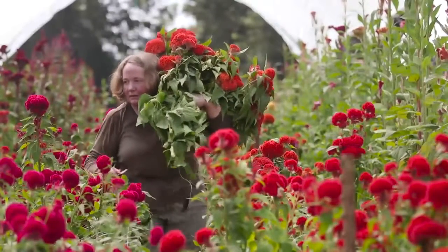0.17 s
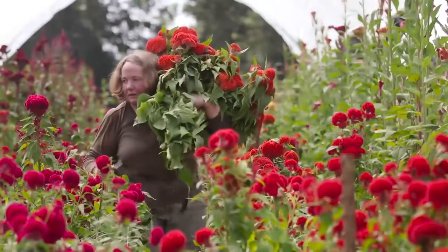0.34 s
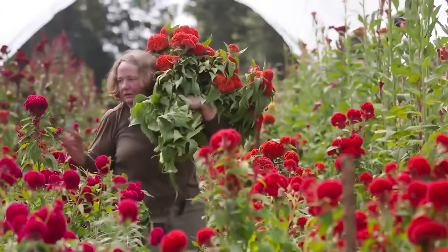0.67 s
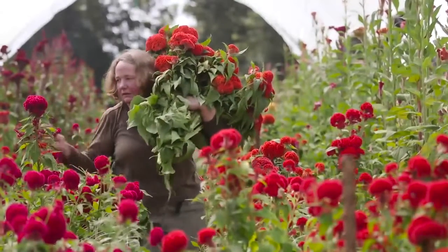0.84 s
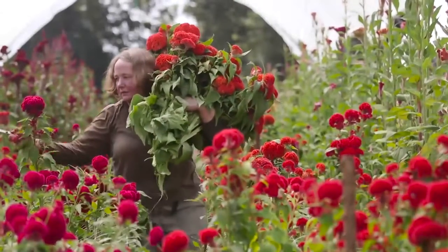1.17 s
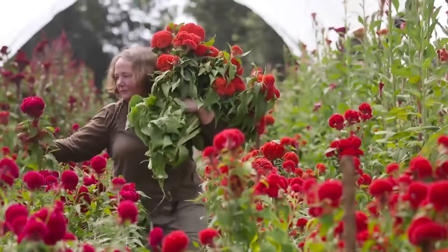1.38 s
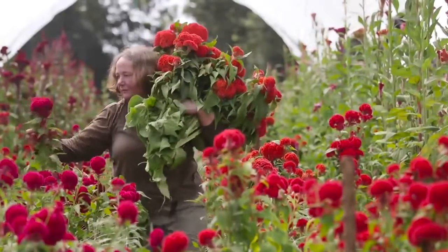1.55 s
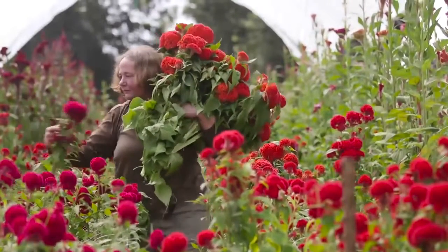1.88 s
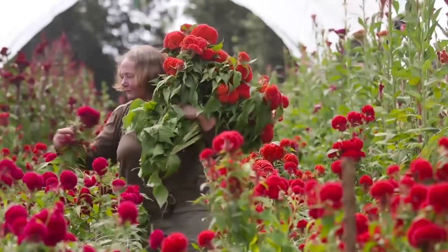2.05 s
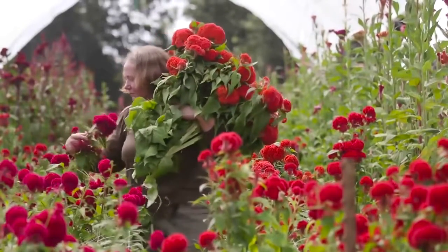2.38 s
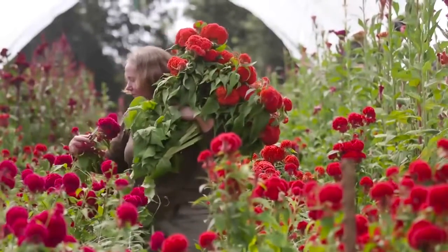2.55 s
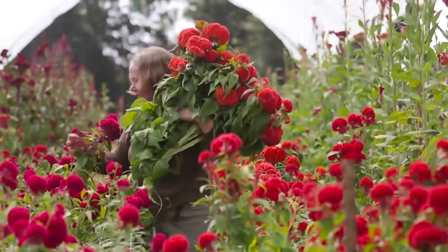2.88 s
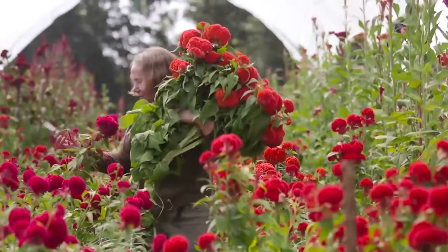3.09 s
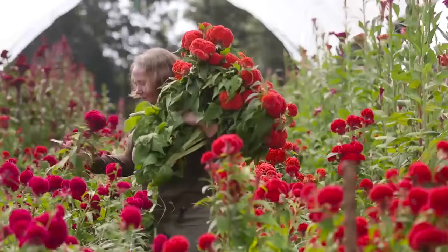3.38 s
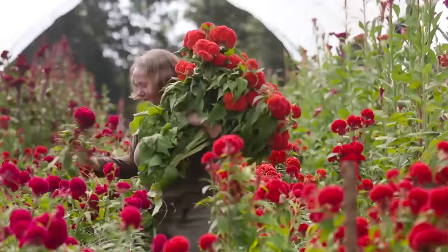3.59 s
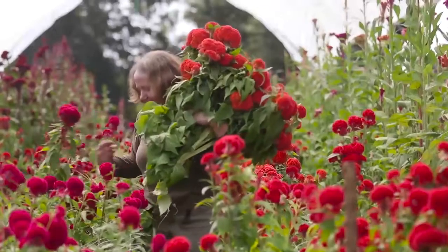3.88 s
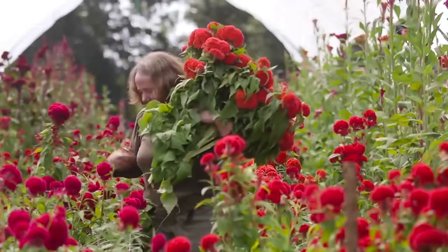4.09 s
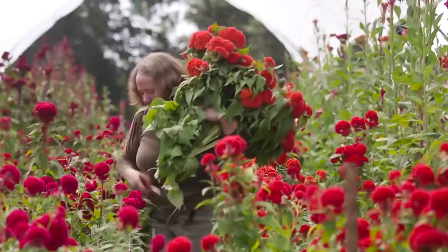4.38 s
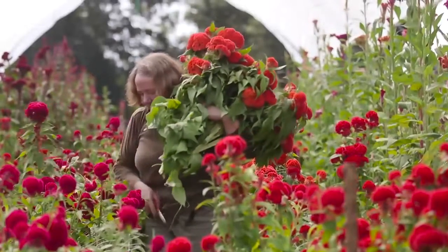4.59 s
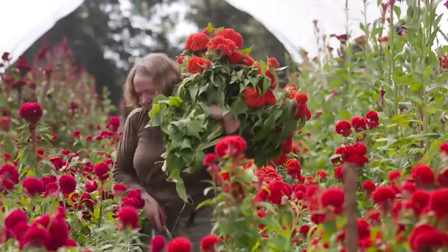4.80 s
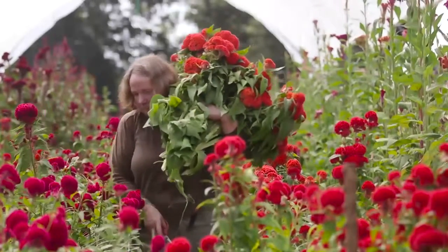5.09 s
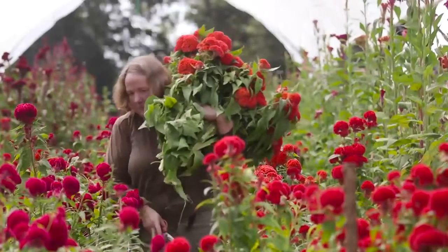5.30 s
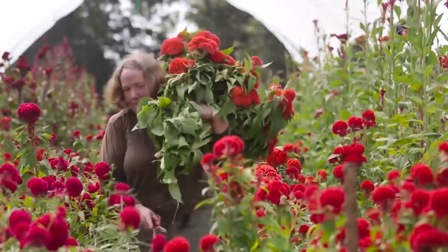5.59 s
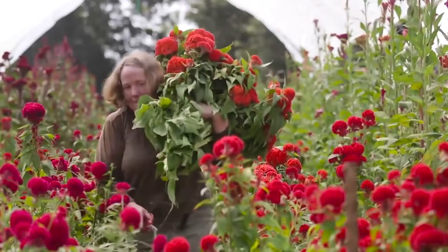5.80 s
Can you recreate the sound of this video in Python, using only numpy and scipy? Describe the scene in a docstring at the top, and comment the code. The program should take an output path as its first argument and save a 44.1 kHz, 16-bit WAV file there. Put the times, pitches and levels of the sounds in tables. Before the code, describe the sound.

A high, fast-pulsing trill of crickets runs throughout in a summer flower field, with a few nearby singers over a blurred distant chorus and the fine hiss and rhythmic rasps of katydids. In the first 0.3 seconds the microphone pops a few times, mostly on the left. A distant bird sings a short gliding phrase twice between 0.2 and 0.9 seconds. Other birds give a quick chirp run at 1.5 seconds and scattered chirps from 2.5 to 4. One close cricket swells until it stops near 3.8 seconds; another joins from about 2.6 to 5.6. Leaves rustle faintly in short brushes between 2.5 and 5.5 seconds. The first bird returns at 4.5 seconds, repeating its phrase four times until the end, near 6 seconds. Underneath lie soft countryside air, a slight early breeze on the left and a very faint, far engine hum.

```python
"""Three ground crickets trill in a summer flower field by stridulation: each wing stroke draws a scraper
over a file and gives a short falling whistle, which the plants scatter. Many more sing further off,
with the fine hiss of meadow katydids. A far bird repeats a gliding phrase, others chirp, and leaves
rustle. At the start the microphone pops a few times, mostly on the left. Behind it all a far engine
hums in the soft noise of the countryside."""
import sys
import numpy as np
from scipy import signal
from scipy.fft import rfft, irfft
from scipy.io import wavfile
from scipy.ndimage import uniform_filter1d

SR = 44100
rng = np.random.default_rng(int(sys.argv[2]) if len(sys.argv) > 2 else 0)


def store_wav(level_fs):
    """Save 16-bit WAV to argv[1]."""
    pcm = np.round(np.clip(np.atleast_2d(level_fs), -1, 1) * 32767)
    wavfile.write(sys.argv[1], SR, pcm.T.astype(np.int16))


N = 261890
T = np.arange(N) / SR
FREQ = np.maximum(np.fft.rfftfreq(N, 1 / SR), 1)
EAR_SIGN = np.array([[1], [-1]])  # left, right


def near_crickets():
    """Superposition: three crickets sing independently, each with its own pitch and spell of song."""
    # drift of each singer: t/s, lead over the even beat/strokes, tooth rate f/Hz before the sag
    high_drift = [(0, -.38, 8196), (.75, -.55, 8197), (3.3, -.45, 8200), (5.94, -.41, 8200)]
    low_drift = [(0, -.05, 7795), (1.6, -.04, 7790), (2.6, -.14, 7790), (3, -.28, 7800), (3.8, -.3, 7790)]
    late_drift = [(2.7, -.08, 7900), (3.65, -.21, 7890), (3.95, -.54, 7770), (4.6, -.43, 7785),
                  (5, -.23, 7880), (5.5, -.17, 7890)]
    # song lists the first four arguments of bout(); shape is unpacked in trill()
    high = cricket(high_drift, stroke_hz=32.3, song=(-2, 8, -42.6, 1),
                   shape=(-.34, .38, .22, .32, 70, 210),
                   bounce_db=-20, lead_rad=-.74, pan_db=1.5, echo_db=-3, t60=.07)
    low = cricket(low_drift, stroke_hz=29.8, song=(-4, 3.82, -38.2, 5.4),
                  shape=(-.37, .39, .32, .15, 170, 250),
                  bounce_db=-11, lead_rad=1.67, pan_db=-2.5, echo_db=-9, t60=.03)
    late = cricket(late_drift, stroke_hz=29.8, song=(2.6, 5.57, -43.3, 1.4),
                   shape=(-.38, .39, .3, .2, 240, 260),
                   bounce_db=-18, lead_rad=2.1, pan_db=-.5, echo_db=-3.5, t60=.064)
    return high + low + late


def cricket(drift, stroke_hz, song, shape, bounce_db, lead_rad, pan_db, echo_db, t60):
    """Two-path interference: a delayed ground reflection beats against the falling direct tone."""
    ground_lag_s = .0054
    gain = bout(*song, stop_s=.02) * undb(-.4 * walk(3.2))
    wings = trill(stroke_hz * T + curve(drift), curve(drift, axis=2), shape)
    plant_sway = np.exp(.3j * walk(1.96))
    bounce = np.roll(wings, int(ground_lag_s * SR)) * plant_sway
    wings = unit(wings + undb(bounce_db) * bounce) * np.sqrt(2) * gain
    echoes = scatter(wings.real, t60)
    # the part of the echoes in step with the wings is removed, so only the diffuse field is added
    coherent = 2 * np.outer(echoes @ wings.conj() / np.vdot(wings, wings), wings).real
    diffuse = undb(echo_db) * (echoes - coherent)
    return (at_ears(wings, lead_rad) + diffuse) * undb(EAR_SIGN * pan_db / 2)


def trill(strokes, hz, shape, spread_hz=9):
    """Stridulation: a scraper runs down a file once a stroke, and the wing rings at the tooth rate."""
    start, end, attack, release, fall_hz, sag_hz = shape  # the first four in strokes
    sag_at, sag_bend = .25, .1  # in strokes
    nearest = np.round(strokes).astype(int)
    pitch, uneven_db, timing = rng.standard_normal((400, 3))[nearest % 400].T
    u = strokes - nearest + .025 * timing  # position within the stroke
    # the pitch eases down through most of the stroke, then drops ever faster
    sag = fall_hz * u + sag_hz * np.exp((np.minimum(u, end) - sag_at) / sag_bend)
    tooth_hz = hz + spread_hz * pitch - sag + 14 * walk(500)
    ramp = np.clip(np.minimum((u - start) / attack, (end - u) / release), 0, 1)
    envelope = unit(np.sin(np.pi / 2 * ramp) ** 2 * undb(uneven_db))
    return np.sqrt(2) * envelope * np.exp(2j * np.pi * np.cumsum(tooth_hz) / SR)


def far_crickets(count=22):
    """Incoherent addition: many trills of unrelated pitch and beat blur into a chorus."""
    # chorus spectrum: f/Hz, gain/dB
    spectrum = [(5800, -57), (6400, -30), (6900, -11.5), (7200, -2.5), (7450, 1.5), (7700, 6), (8000, 6),
                (8250, -18), (8400, -24)]
    # chorus strength: t/s, relative level/dB
    levels = [(0, -46.8), (2, -45.4), (3.9, -47.6), (5.45, -46.4), (5.65, -50.8)]
    shape = (-.37, .37, .37, .37, 150, 150)
    chorus = 0
    for hz in np.linspace(6000, 8200, count):
        strokes = rng.uniform(24, 36) * T + rng.random() + .2 * walk(2)
        chorus = chorus + scatter(trill(strokes, hz, shape, spread_hz=64.97).real, t60=.034)
    return unit(colour(chorus, spectrum)) * undb(curve(levels) + 4.5)


def katydids():
    """Broadband stridulation: far hiss, high buzzes and one singer's lisps and rasps add in power."""
    # hiss spectrum: f/Hz, gain/dB
    spectrum = [(4500, -11), (6300, -12.5), (7600, 0), (8600, 3.5), (8950, -2.5), (9300, 1.4), (9900, 0.8),
                (11500, -3.5), (13000, -5.5), (14500, -3.5), (15800, -5)]
    # long, very high buzzes: start t/s, end t/s, level/dB, swell time/s
    buzzes = [(-1, 1.61, -44.4, .8), (-1, 4.38, -50, .5), (-1, 5.19, -50, .5), (2.1, 4.06, -45.2, 1.8),
              (5.25, 7, -46.6, .17)]
    # runs of a short lisp followed by a longer rasp: first lisp t/s, repeats
    lisp_runs = [(-.235, 2), (.738, 12)]
    period_s, lisp_s, lisp_db = .445, .051, -44.5
    rasp_after_s, rasp_s, rasp_db = .25, .48, -47
    split_hz, far_lower_db, far_upper_db, buzz_spill_db = 11800, -48, -55, -5
    through_stems = scatter(rng.standard_normal(N), t60=.095)
    hiss = colour(through_stems + undb(-7) * wide_noise(1.15), spectrum)
    top = irfft(rfft(hiss) / (1 + (split_hz / FREQ) ** 16), N)
    beats = [first + k * period_s for first, count in lisp_runs for k in range(count)]
    lisps = sum(undb(lisp_db + rng.standard_normal()) * arch((T - s) / lisp_s) for s in beats)
    rasp_power = undb(rasp_db) ** 2 * sum(arch((T - s - rasp_after_s) / rasp_s) for s in beats)
    buzz_power = sum(bout(*row, stop_s=.078) ** 2 for row in buzzes)
    lower_power = undb(far_lower_db) ** 2 + rasp_power + undb(buzz_spill_db) ** 2 * buzz_power
    upper_power = undb(far_upper_db) ** 2 + buzz_power
    lower = unit(hiss - top) * np.sqrt(lower_power) * undb(1.3 * walk(16))
    upper = unit(top) * np.sqrt(upper_power) * undb(.24 * walk(12))
    lisp_spectrum = [(7500, -19), (9000, 6), (11000, 6), (12000, 0), (14000, -14)]  # f/Hz, gain/dB
    lisp_noise = unit(colour(wide_noise(-4.5), lisp_spectrum))
    pulsed = lower * pulsing(stroke_hz=89) + upper * pulsing(stroke_hz=69)
    return pulsed * undb(.5 * walk(120)) + lisps * lisp_noise


def pulsing(stroke_hz, depth_db=.65):
    """Amplitude modulation by a katydid's slightly uneven wing strokes."""
    return undb(depth_db * np.sin(2 * np.pi * (stroke_hz * T + .26 * walk(9))))


def bird():
    """Reverberation: trees smear the repeated phrase of a far bird straight ahead and add a tail."""
    # one phrase: offset t/s, length/s, start f/Hz, end f/Hz, upward bow/Hz, level/dB, roughness/Hz
    notes = [(-.135, .06, 3700, 3520, 40, -5.5, 100), (-.112, .05, 3250, 2920, -40, -5.5, 90),
             (-.018, .044, 2720, 2220, 0, -.5, 80), (.002, .056, 2240, 2210, -55, 0, 35),
             (.05, .04, 3000, 2920, 0, -4, 25), (.09, .066, 2540, 2610, 100, 0, 36),
             (.13, .05, 2300, 1750, -60, -4.5, 120)]
    # phrases of two songs: t/s, relative level/dB, tilt towards high notes/(dB per octave)
    phrases = [(.283, -45.8, -2), (.692, -46.2, -2), (4.535, -48.8, 0), (4.955, -49.2, 1),
               (5.378, -48.8, 2), (5.822, -51.5, 3)]
    pivot_hz = 2700
    sung = []
    for start, phrase_db, tilt in phrases:
        for offset, length, from_hz, to_hz, bow_hz, db, rough_hz in notes:
            note_db = phrase_db + db + tilt * np.log2(from_hz / pivot_hz)
            sung.append((start + offset, length, from_hz, to_hz, bow_hz, note_db, rough_hz))
    song = whistles(sung)
    return undb(-.5) * song + undb(-9) * scatter(song, t60=.07) + undb(-4) * scatter(song, t60=.5)


def other_birds():
    """Interaural phase: lone chirps from far to one side reach the ears out of step, amid echoes."""
    # chirps: t/s, length/s, start f/Hz, end f/Hz, upward bow/Hz, relative level/dB, roughness/Hz
    chirps = [(1.496, .014, 3480, 3400, 0, -55, 30), (1.515, .016, 3470, 3380, 0, -48.5, 30),
              (1.537, .014, 3440, 3390, 0, -49.5, 30), (1.558, .016, 3430, 3370, 0, -48.5, 30),
              (2.52, .025, 2350, 2520, 0, -55, 40), (2.57, .03, 2950, 3150, 40, -54, 40),
              (2.66, .04, 2750, 2780, 0, -56, 60), (2.765, .025, 2400, 2680, 0, -54.5, 40),
              (2.935, .035, 2200, 2450, 60, -53.5, 40), (2.988, .03, 2720, 3080, 90, -49, 35),
              (3.13, .026, 4050, 4170, 30, -56, 50), (3.175, .05, 2380, 2750, 0, -53.5, 90),
              (3.412, .03, 2780, 3100, 70, -49, 35), (3.51, .03, 2600, 2580, 0, -55, 40),
              (3.53, .16, 3250, 3620, 60, -54, 170), (3.565, .025, 1850, 1900, 0, -55, 30),
              (3.618, .036, 2380, 2680, 60, -50.5, 80), (3.915, .05, 3250, 3600, 70, -51.5, 130)]
    song = whistles(chirps)
    direct = at_ears(signal.hilbert(song), lead_rad=2.1)
    return undb(-2) * direct + undb(-5) * scatter(song, t60=.35)


def whistles(notes):
    """Frequency modulation: bird notes glide and arch, roughened on their way through the trees."""
    song, flutter = np.zeros(N), walk(900)
    for start, length, from_hz, to_hz, bow_hz, db, rough_hz in notes:
        u = (T - start) / length
        on = (u > 0) & (u < 1)
        swell = np.sin(np.pi * u[on])
        glide_hz = from_hz + (to_hz - from_hz) * u[on] + bow_hz * swell
        hz = glide_hz * (1 + .0037 * rng.standard_normal()) + rough_hz * flutter[on]
        song[on] += undb(db) * swell * np.sin(2 * np.pi * np.cumsum(hz) / SR)
    return song * (1 + .5 * walk(400))


def microphone_pops():
    """Exponential relaxation: each small knock is a step that decays, sometimes with a slow bump."""
    # knocks: t/s, left step, right step, decay time/s
    steps = [(0.046, -0.26, 0.00078, 0.00035), (0.0885, 0.21, 0.026, 0.00015),
             (0.1926, 0.19, 0.033, 0.0006), (0.2338, -0.039, 0.023, 0.00038),
             (.278, -0.075, -0.024, 0.00051)]
    # soft bumps on the left: t/s, amplitude, f/Hz
    bumps = [(0.086, 0.021, 130), (0.233, -0.021, 121)]
    knocks = np.zeros((2, N))
    for s, left, right, decay in steps:
        knocks += np.outer([left, right], (T >= s) * np.exp(-np.abs(T - s) / decay))
    for s, size, hz in bumps:
        knocks[0] += size * np.sin(2 * np.pi * hz * (T - s)) * arch((T - s) * hz / 2)
    return signal.sosfilt(signal.butter(1, [90, 4000], "band", fs=SR, output="sos"), knocks)


def leaves():
    """Friction noise: leaves brushed while picking flowers give short sprays of tiny crackles."""
    # brushes: middle t/s, length/s, level/dB
    rustles = [(2.62, .25, -64), (2.83, 0.14, -60), (3.27, .12, -60), (3.585, 0.092, -66),
               (3.7, 0.092, -58), (3.97, .1, -58), (4.267, 0.083, -54), (5.316, 0.11, -56),
               (5.48, .08, -58)]
    # crackle spectrum: f/Hz, gain/dB
    spectrum = [(1200, -14), (2000, -2), (4000, 17), (6300, -6), (10000, -26)]
    crackle = unit(colour(wide_noise(-1.6) * undb(.72 * walk(340)), spectrum))
    return crackle * sum(undb(db) * arch((T - s) / length) for s, length, db in rustles)


def engine():
    """Fading: a far engine's wavering partials vary in level and phase on the way, blurring the hum."""
    # high overtones: f/Hz, level/dB
    partials = [(301, -68.5), (570, -68), (870, -68.5)]
    # low partials: t/s, relative level/dB of the fundamental, relative level/dB of the octave
    levels = [(.5, -73, -79), (1.35, -67, -73), (2.1, -65, -73.5), (2.6, -74.5, -65.5), (3.05, -75, -68.5),
              (3.6, -78, -80), (4.3, -67, -75.5), (5.4, -66, -72), (5.94, -69, -81)]
    fundamental_hz = 97.7
    phase_per_hz = 2 * np.pi * np.cumsum(1 + .00391 * walk(4)) / SR
    overtones = sum(undb(db + 2 * walk(3.34)) * np.sin(hz * phase_per_hz + .74 * walk(25))
                    for hz, db in partials)
    fundamental = np.sin(fundamental_hz * phase_per_hz + .36 * walk(14))
    fundamental *= undb(curve(levels) + 3.5 + 1.8 * walk(6.2))
    octave = np.sin(2 * fundamental_hz * phase_per_hz + .47 * walk(13))
    octave *= undb(curve(levels, axis=2) + 4 + 2 * walk(3.09))
    return fundamental + octave + overtones


def countryside():
    """Ambient noise: far air and roads slowly quieten, and a low breeze on the left dies down."""
    # spectrum of air and roads: f/Hz, gain/dB
    air_spectrum = [(20, -35), (55, -11.5), (120, -4.5), (165, -6), (250, -3), (350, -.5), (580, 0.5),
                    (800, -2.5), (1100, -4), (1800, -7.5), (3300, -9), (4200, -13.5), (5500, -32),
                    (7000, -52)]
    # puffs of wind, then near calm: t/s, level/dB
    puffs = [(.2, -57), (.7, -77), (1.35, -62), (1.7, -72), (2.7, -78), (4.5, -76), (5.3, -84)]
    breeze_spectrum = [(20, -9), (60, 7), (150, -3), (400, -37)]  # f/Hz, gain/dB
    air_db, fall_db_per_s = -47, .4849
    air = unit(colour(wide_noise(-4), air_spectrum))
    air *= undb(air_db - fall_db_per_s * T + .5 * walk(14))
    breeze = unit(colour(rng.standard_normal(N), breeze_spectrum))
    breeze *= undb(curve(puffs) + 2 * walk(5.7))
    return air + np.outer([1, .2], breeze)


def scatter(x, t60):
    """Diffuse scattering: echoes off leaves and stems, different at each ear, fall 60 dB in t60 s."""
    t = T[:SR // 2]
    echoes = rng.standard_normal((2, len(t))) * undb(-60 * t / t60)
    wet = signal.fftconvolve(x[None], echoes, axes=1)[:, :N]
    return wet * np.std(x) / np.std(wet, axis=1, keepdims=True)


def at_ears(analytic, lead_rad):
    """Interaural phase difference: the left ear leads the right by lead_rad."""
    return np.real(analytic * np.exp(.5j * lead_rad * EAR_SIGN))


def bout(start, end, db, swell_s, stop_s):
    """Trapezoidal envelope of one spell of song: it swells, holds and stops."""
    return undb(db) * np.clip((T - start) / swell_s, 0, 1) * np.clip((end - T) / stop_s + .5, 0, 1)


def arch(u):
    """Raised-cosine swell between u = -1/2 and 1/2."""
    return np.cos(np.pi * np.clip(u, -.5, .5)) ** 2


def colour(x, points):
    """Spectral shaping by (f/Hz, gain/dB) points, joined on a logarithmic frequency axis."""
    hz, db = np.transpose(points)
    gain_db = np.interp(np.log(FREQ), np.log(hz), db, left=-90, right=-90)
    return irfft(rfft(x) * undb(gain_db), N)


def wide_noise(side_db):
    """Partly correlated stereo noise, its side signal at side_db relative to its middle."""
    mid, side = rng.standard_normal((2, N))
    return mid + undb(side_db) * EAR_SIGN * side


def walk(rate):
    """Random fluctuation of rms 1, sliding to a new value rate times a second."""
    k = int(SR / rate)
    steps = np.repeat(rng.standard_normal(N // k + 1), k)
    return unit(uniform_filter1d(steps, k)[:N])


def curve(rows, axis=1):
    """Linear interpolation in time of one column of a table."""
    rows = np.array(rows)
    return np.interp(T, rows[:, 0], rows[:, axis])


def undb(db):
    """Decibels to amplitude ratio."""
    return 10 ** (np.asarray(db) / 20)


def unit(x):
    """Normalisation to rms 1."""
    return x / np.sqrt(np.mean(np.abs(x) ** 2))


def scene():
    """Linear superposition of all the sources in the field."""
    singers = near_crickets() + far_crickets() + katydids() + bird() + other_birds()
    return singers + microphone_pops() + engine() + countryside() + leaves()


def record(dry):
    """Band limiting: a steep low-pass filter cuts the highest treble."""
    cutoff_hz = 15720
    return signal.sosfilt(signal.ellip(12, .1, 80, cutoff_hz, fs=SR, output="sos"), dry)


dry = scene()
out = record(dry)
store_wav(out)
```